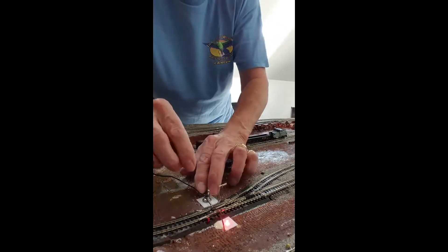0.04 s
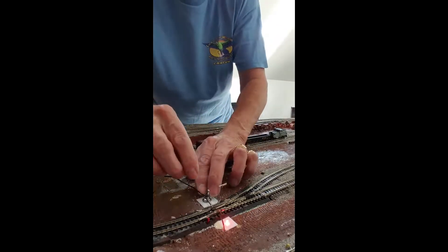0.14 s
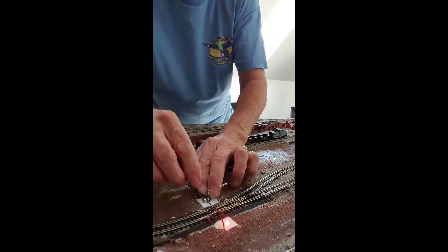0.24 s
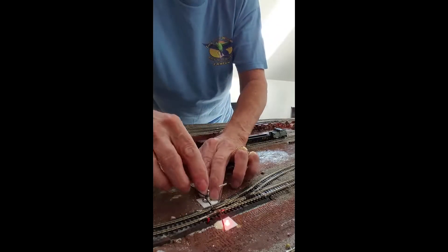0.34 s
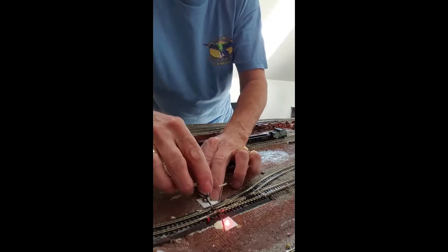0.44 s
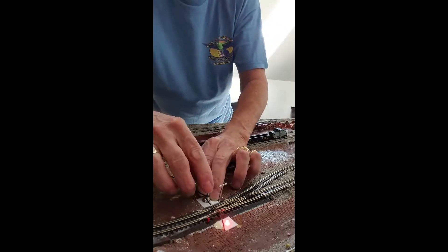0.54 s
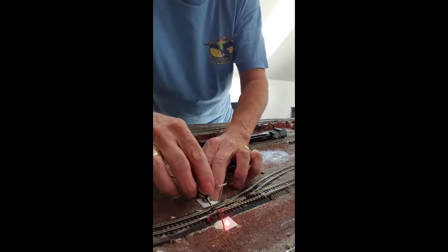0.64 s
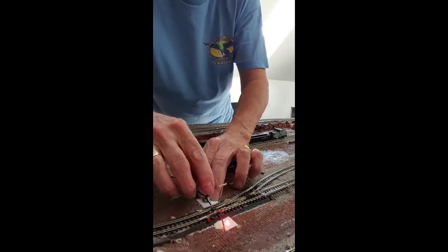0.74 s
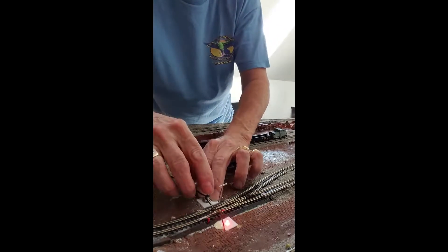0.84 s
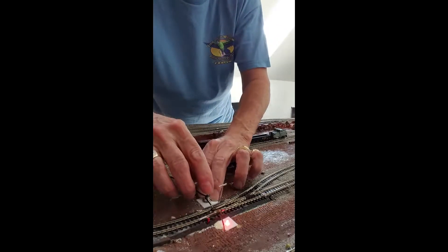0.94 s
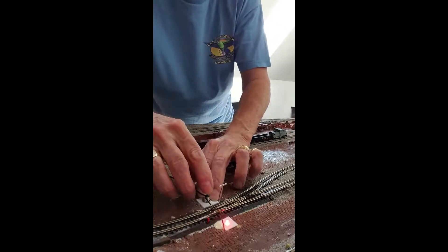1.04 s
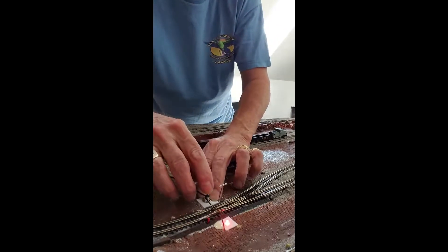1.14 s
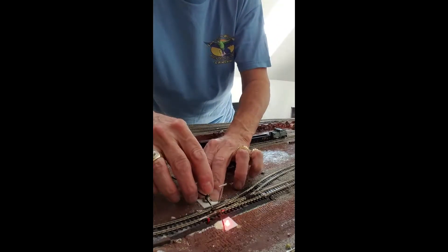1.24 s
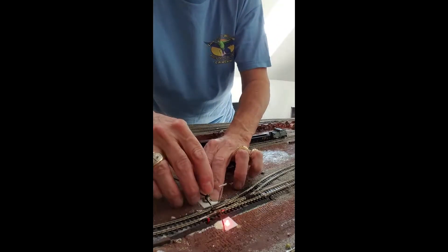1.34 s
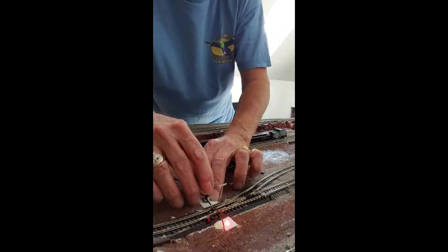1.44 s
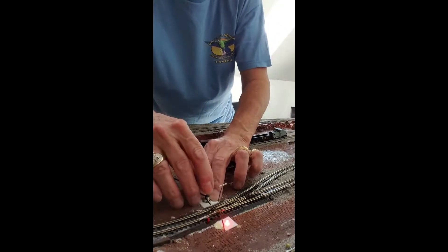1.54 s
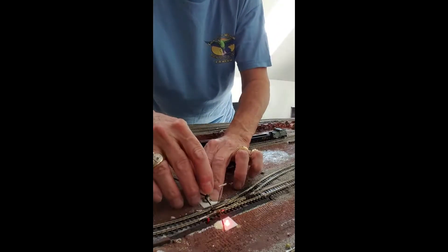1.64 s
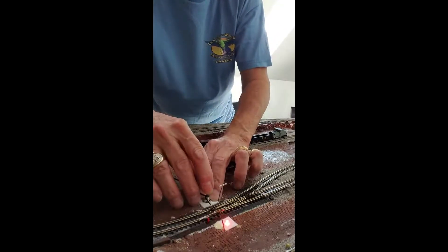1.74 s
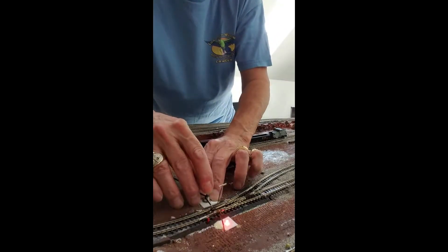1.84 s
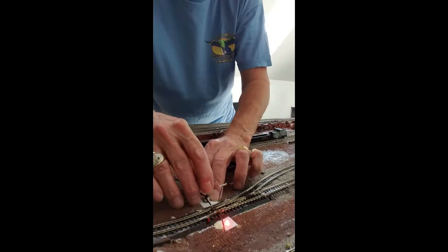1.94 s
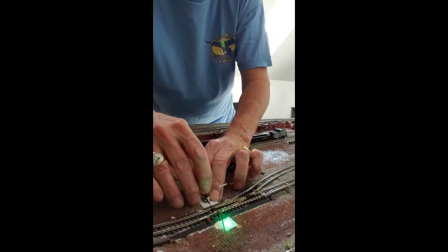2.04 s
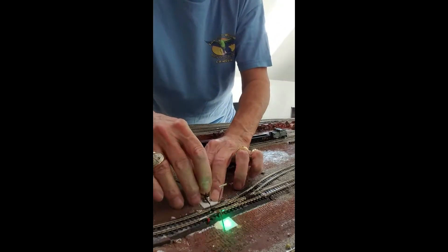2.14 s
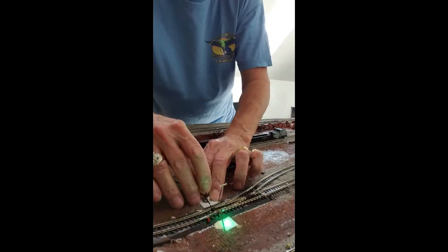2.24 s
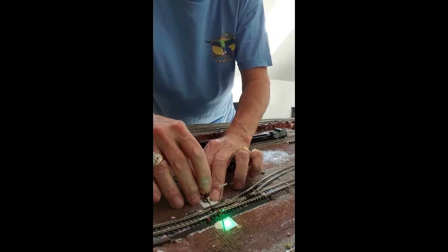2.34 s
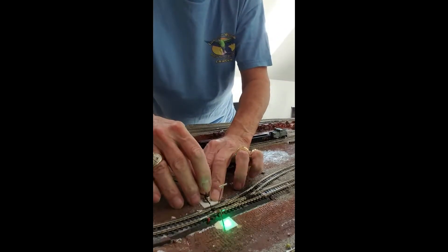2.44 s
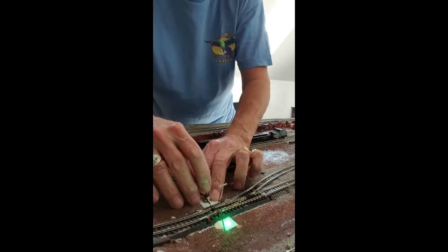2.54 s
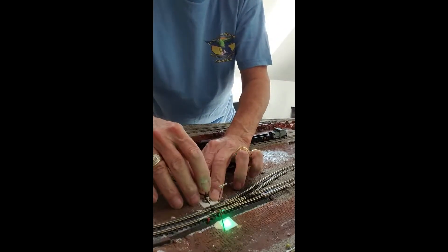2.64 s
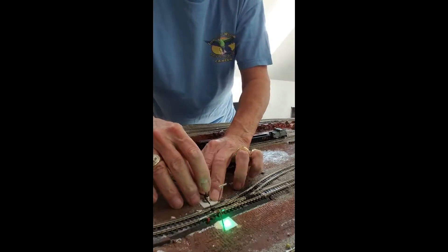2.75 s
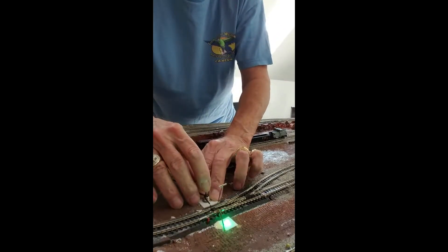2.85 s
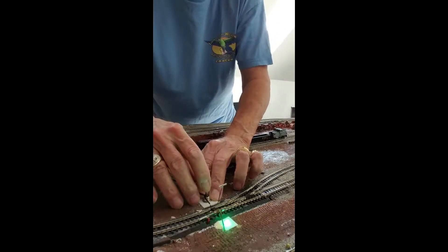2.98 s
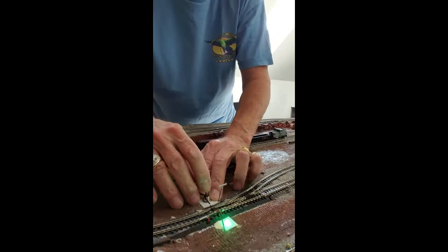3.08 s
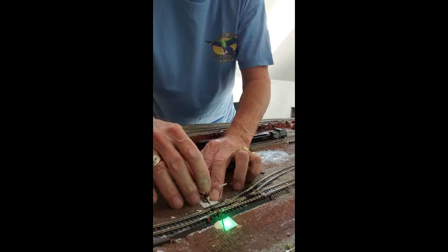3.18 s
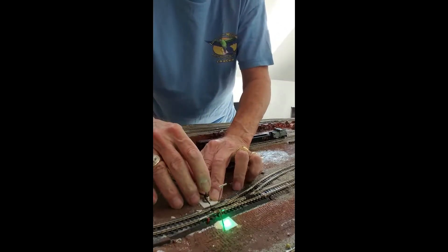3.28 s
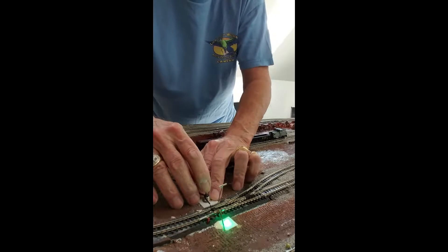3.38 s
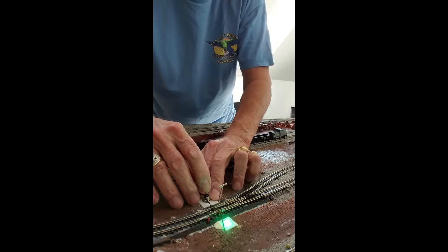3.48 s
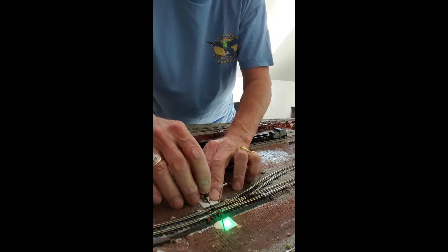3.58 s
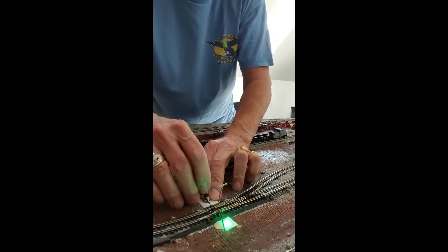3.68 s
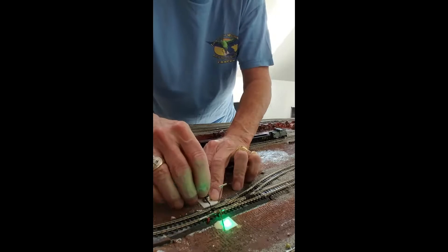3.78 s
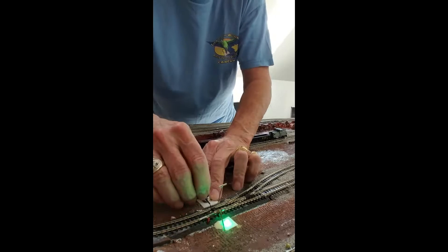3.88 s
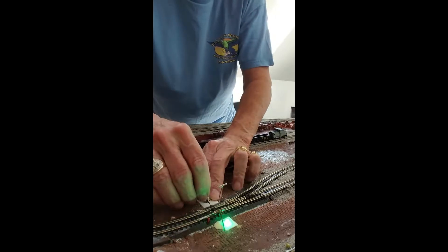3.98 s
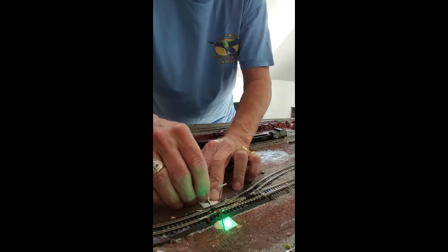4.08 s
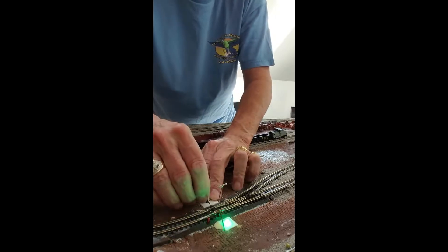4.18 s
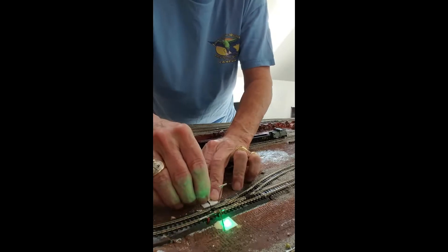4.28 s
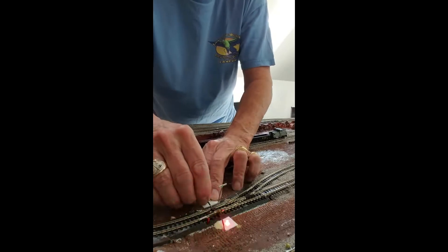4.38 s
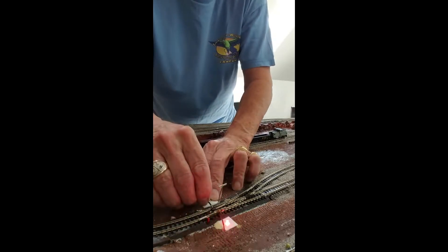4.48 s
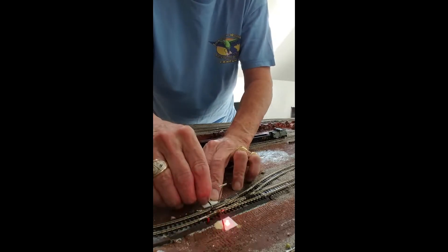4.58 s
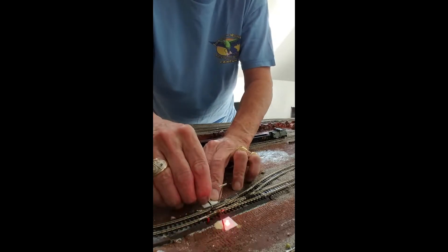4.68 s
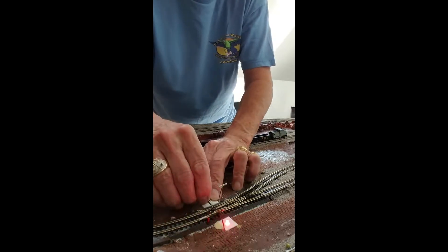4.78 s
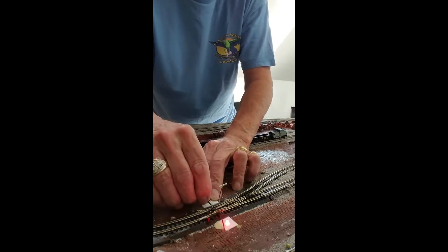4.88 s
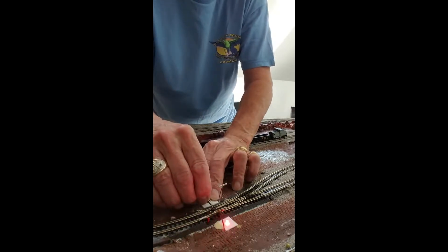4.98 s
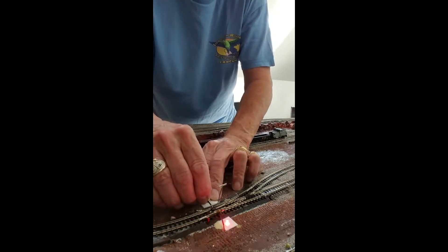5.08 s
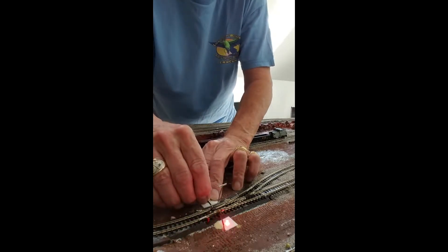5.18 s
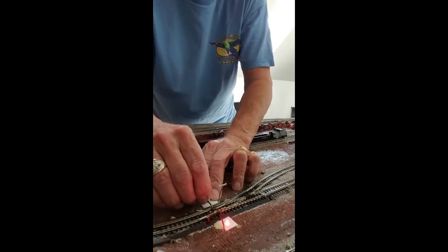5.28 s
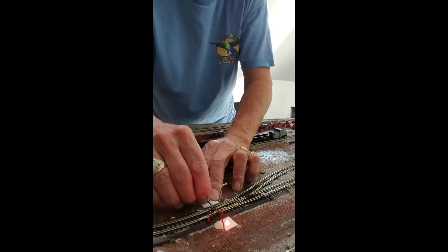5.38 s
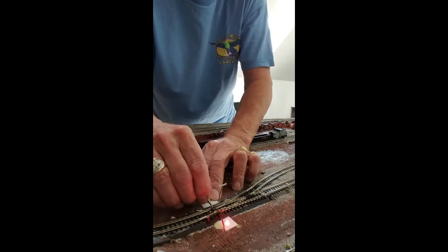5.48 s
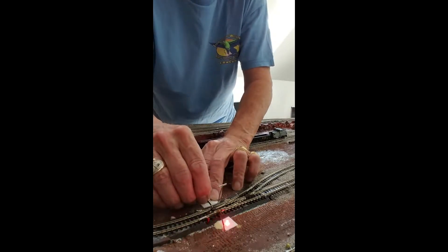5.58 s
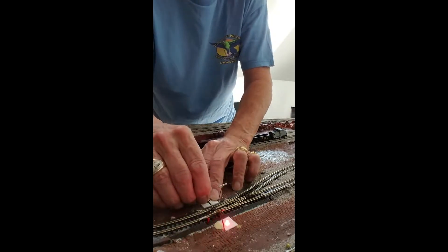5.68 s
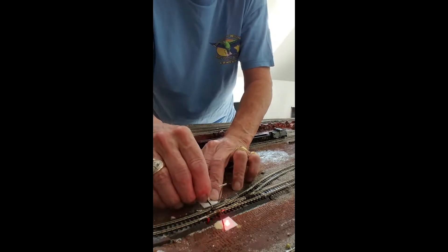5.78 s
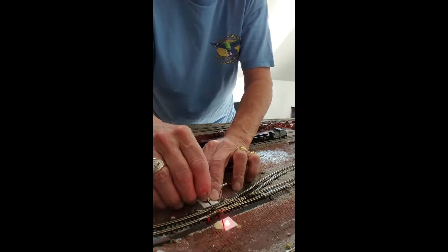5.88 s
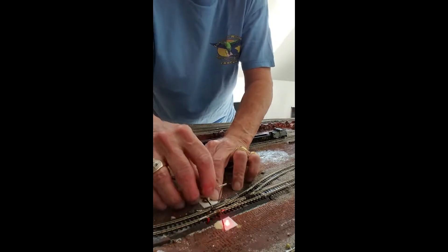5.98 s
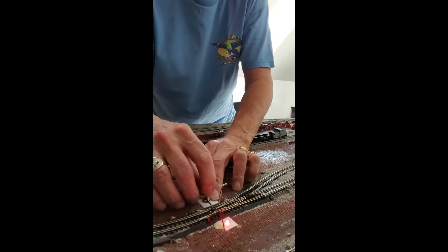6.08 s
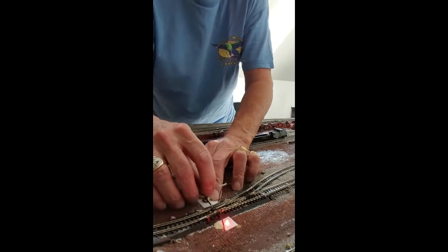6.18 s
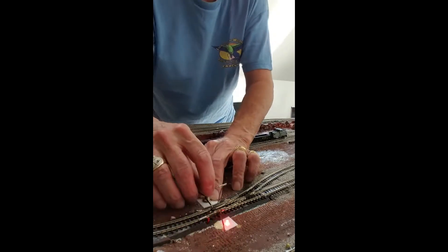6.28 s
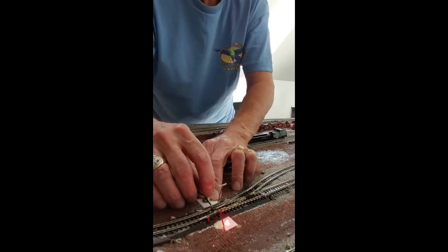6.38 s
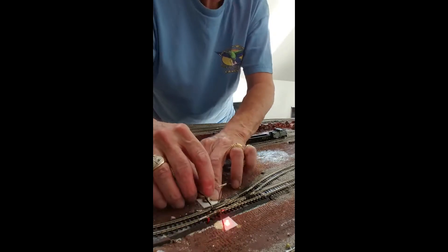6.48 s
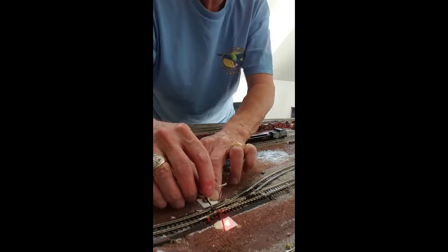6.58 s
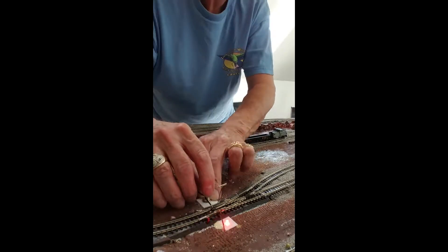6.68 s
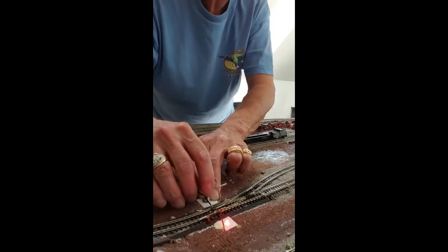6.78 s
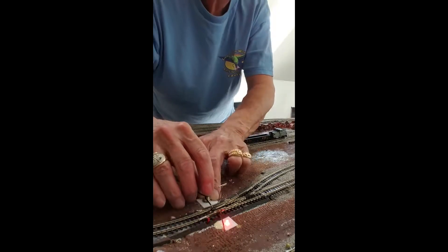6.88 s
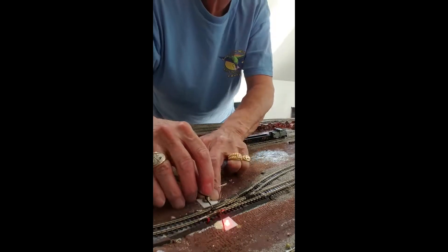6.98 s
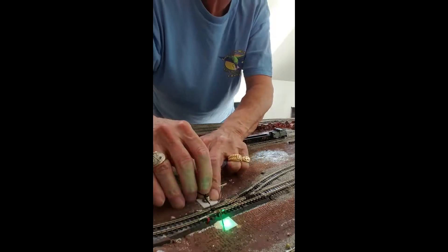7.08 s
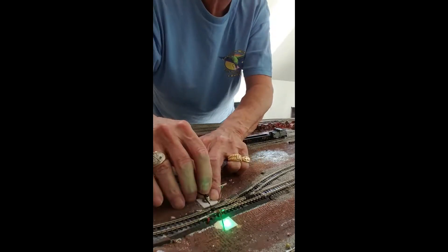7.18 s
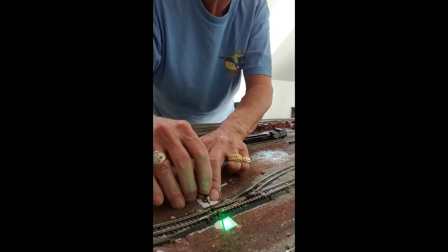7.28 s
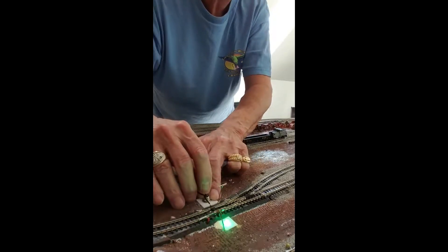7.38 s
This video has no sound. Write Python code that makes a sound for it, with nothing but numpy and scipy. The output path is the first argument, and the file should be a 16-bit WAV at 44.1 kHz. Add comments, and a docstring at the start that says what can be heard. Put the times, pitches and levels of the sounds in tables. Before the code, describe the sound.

Close fumbling touches on a hollow board, then a sharp metallic switch crack, followed by light ticks and two softer snaps in a quiet small room.

```python
"""From the start, air hiss (shaped noise) and a wavering hum with a trace of buzz (sines) lie underneath.
Fingers and nails tap (bursts of noise, damped board modes) and rub (random jerks) around a toggle switch
in a wooden model railway board. At about 2.2, 4.5 and 7.1 s the lever slides and snaps over: a rattling
metal crack (noise) sets the board ringing, with touches in between; a small room answers every sound."""
import sys
import numpy as np
from scipy import signal
from scipy.io import wavfile

SR = 44100
rng = np.random.default_rng(int(sys.argv[2]) if len(sys.argv) > 2 else 0)


def persist_wave(psi):
    """Save psi, clipped to +-1, as 16-bit WAV."""
    counts = np.round(np.clip(psi, -1, 1) * 32767).astype(np.int16)
    wavfile.write(sys.argv[1], SR, np.atleast_2d(counts).T)


N = 327663
TIME = np.arange(N) / SR
BLOW_TIME = TIME[:SR // 12]  # span of one contact
RING_TIME = TIME[:SR // 3]  # span of board ringing and of reflections
BANDS_HZ = 15000 / 2 ** (np.arange(27)[::-1] / 3)  # third-octave centres
EDGES_HZ = np.geomspace(360, 16800, 23) - 300  # edges of bands that widen with frequency


def from_db(db):
    """Level to amplitude: 20 dB is a factor of ten."""
    return 10 ** (np.asarray(db) / 20)


def at_hz(table, hz):
    """Interpolation on a logarithmic frequency axis gives a table's columns at hz."""
    pitches, *columns = np.transpose(table)
    return [np.interp(np.log(hz), np.log(pitches), column) for column in columns]


def fade(t, t60):
    """Exponential decay: free decay loses 60 dB in t60 seconds."""
    return np.exp(-np.log(1000) * t / t60)


def unit_energy(x):
    """Energy normalisation: the squares of each row sum to 1."""
    return x / np.sqrt(np.sum(x ** 2, axis=-1, keepdims=True) + 1e-30)


def band_pass(x, low, high):
    """Causal filtering: a Butterworth band-pass keeps low to high Hz."""
    sections = signal.butter(2, [low, high], "band", fs=SR, output="sos")
    return signal.sosfilt(sections, x + 1e-18)


def third_octave(x, hz):
    """Constant relative bandwidth: a third of an octave around hz, energy 1 per row."""
    return unit_energy(band_pass(x, hz / 2 ** (1 / 6), hz * 2 ** (1 / 6)))


def stereo(pair, pan_db, alike):
    """Interchannel correlation: mixing two unrelated signals sets left-right balance and likeness."""
    alike, sides = np.clip(alike, -1, 1), np.array([[1], [-1]])
    mid, side = pair[..., :1, :], pair[..., 1:, :]
    mixed = np.sqrt((1 + alike) / 2) * mid + np.sqrt((1 - alike) / 2) * side * sides
    return mixed * from_db(sides * pan_db / 2)


def drift(rate):
    """Slow random modulation: straight lines join normal random values drawn rate times a second."""
    knots = np.arange(0, TIME[-1] + 1, 1 / rate)
    return np.interp(TIME, knots, rng.standard_normal(len(knots)))


def add(out, sounds, times):
    """Superposition: each sound is summed in at its time."""
    for sound, s in zip(sounds, times):
        start = max(round(s * SR), 0)
        out[:, start:start + sound.shape[-1]] += sound[:, :N - start]


# Direct sound at the two microphones: f/Hz, left-right/dB, likeness (1 = identical)
DIRECT_SIDES = [(100, -10.5, 0.82), (348, -1, .92), (781, -8.5, 0.21), (1550, -1, 0.68), (3260, -5, 0),
                (5730, 9.5, 0), (9450, -3.5, .1), (14600, 12.5, 0.41)]


def microphones(hz):
    """Interchannel level difference and correlation of the direct sound vary with frequency."""
    return at_hz(DIRECT_SIDES, hz)


# Still air: f/Hz, level/dB per third octave, left-right/dB, likeness
AIR_HISS = [(30.8, -72.5, -5, 0.44), (54.4, -71.5, 3, 0.11), (99, -76.5, 6, 0.97), (168, -79, -3.5, 0.25),
            (400, -77, -1, 0.28), (860, -80.5, -3.5, 0.13), (1720, -80, -1, 0.39), (3207, -83, -0.5, 0.1),
            (6500, -87, 2, 0.083), (9900, -86, -2, .1), (12500, -81, -0.5, 0.083), (14760, -77.5, 1, .1)]
HUM_HZ, BUZZ_HZ = 89, 119
HUM_DB, HUM_SWELL_DB = -73.5, 6  # amplitude before the left and right gains; swell to either side
HUM_PERIOD_S, HUM_CREST_S, HUM_WANDER_RAD = 2.55, 1.3, 0.99


def background(waver_db):
    """Stationary noise and modulated tones: even hiss, a wavering low hum and a trace of mains buzz."""
    white, hiss = rng.standard_normal((2, 2, N)), 0
    for k, hz in enumerate(BANDS_HZ):
        level_db, pan_db, alike = at_hz(AIR_HISS, hz)
        band = stereo(third_octave(white[k % 2], hz), pan_db, alike)
        hiss = hiss + from_db(level_db) * np.sqrt(N) * band
    swell_db = HUM_SWELL_DB * np.cos(2 * np.pi * (TIME - HUM_CREST_S) / HUM_PERIOD_S)
    hum_gain = from_db(HUM_DB + swell_db + waver_db * drift(36))
    hum = hum_gain * np.sin(2 * np.pi * HUM_HZ * TIME + HUM_WANDER_RAD * drift(18))
    buzz_gain = from_db(-74 + waver_db * drift(3.3))
    buzz = buzz_gain * np.sin(2 * np.pi * BUZZ_HZ * TIME + drift(1))
    return hiss + hum * from_db([[1], [7]]) + buzz * from_db([[-3], [3]])


# Fingertips dragging over board and lever: start t/s, end t/s, relative level/dB at the start,
# swell/dB by the end
STROKES_OF_FINGERS = [(0.056, 0.174, -54.5, -4.5), (0.263, 0.732, -58, -6.5), (1.115, 1.507, -74, -10),
                      (3.183, 3.376, -57, -4), (3.735, 3.892, -60.5, -5), (4.1, 4.118, -63, -6),
                      (4.377, 4.51, -57.5, 5), (5.975, 6.25, -54, -5), (6.382, 6.506, -53.5, -3.5),
                      (6.985, 7.029, -44.5, -8), (7.076, 7.155, -50.5, 9)]
STROKE_ATTACK_S, STROKE_RELEASE_T60_S = 0.032, 0.305
RESTING_RUB_DB, RESTING_WAVER_DB = -72.5, 6.5  # resting fingers never keep quite still


def pressure():
    """Amplitude envelope: strokes set in quickly, swell or ease and let go; between them fingers rest."""
    total = from_db(RESTING_RUB_DB + RESTING_WAVER_DB * drift(20))
    for start, end, level_db, swell_db in STROKES_OF_FINGERS:
        attack = np.clip(1 + (TIME - start) / STROKE_ATTACK_S, 0, 1)  # complete at start
        release = fade(np.maximum(TIME - end, 0), STROKE_RELEASE_T60_S)
        stroke_db = level_db + np.interp(TIME, [start, end], [0, swell_db])
        total = total + attack * release * from_db(stroke_db)
    return total


# Colour of the dragging: f/Hz, relative level/dB per third octave
FRICTION_COLOUR = [(60, -31), (130, -22), (260, -10), (420, -8.5), (800, -17), (1400, -23.5), (3000, -18.5),
                   (6000, -28), (10000, -33), (15000, -27.5)]


def rubbing(slips_per_s, grain_db):
    """Stick-slip friction: skin sticks and slips in many small, uneven jerks."""
    slips = (rng.random(N) < slips_per_s / SR) * from_db(grain_db * rng.standard_normal(N))
    jerks = slips * rng.standard_normal((2, 2, N))
    sound = 0
    for k, hz in enumerate(BANDS_HZ):
        band = stereo(third_octave(jerks[k % 2], hz), *microphones(hz))
        sound = sound + from_db(at_hz(FRICTION_COLOUR, hz)[0]) * band
    return sound * np.sqrt(N) * pressure()


# Where thud, level, knock, tick and sheen act: f/Hz
COLOUR_ZONES_HZ = [190, 450, 770, 2900, 12000]


def force(blows, hz):
    """Excitation spectrum: flesh gives thud, nail and metal give tick and sheen."""
    _, level_db, thud_db, *upper_db = np.transpose(blows)
    colours = [thud_db, 0 * level_db, *upper_db]
    table = np.column_stack([COLOUR_ZONES_HZ[:len(colours)], colours])
    return from_db(level_db + at_hz(table, hz))[:, None, None]


def contacts(blows, spectrum, rattle, ring_db, ring_t60, lead):
    """Impact noise: a brief rattle of tiny impacts trails off in dense ringing and scuffing."""
    swell = BLOW_TIME / rattle  # the rattle peaks at 1
    ringing = from_db(ring_db) * np.tanh(swell) * fade(BLOW_TIME, ring_t60)
    envelope = swell ** 2 * np.exp(2 * (1 - swell)) + ringing
    impacts = rng.standard_normal((len(blows), 2, 2, len(BLOW_TIME))) * envelope
    sounds, out = 0, np.zeros((2, N))
    for k, (low, high) in enumerate(zip(EDGES_HZ, EDGES_HZ[1:])):
        hz, thirds = (low + high) / 2, 3 * np.log2(high / low)  # thirds: width in third octaves
        band = stereo(unit_energy(band_pass(impacts[:, k % 2], low, high)), *microphones(hz))
        gain = from_db(at_hz(spectrum, hz)[0]) * np.sqrt(thirds)
        sounds = sounds + force(blows, hz) * gain * band
    add(out, sounds, np.array(blows)[:, 0] - lead)
    return out


# Modes of the board, the switch case and, ringing faintly on, its metal parts:
# f/Hz, relative level/dB, t60/s
BOARD_MODES = [(89, -31.5, 0.55), (106.5, -14.5, 0.3), (128.5, -19.5, .07), (189.8, -21, 0.26),
               (245.4, -9.5, 0.11), (316, 1.5, 0.031), (391, 2.5, 0.037), (395, -16, .27), (453, -1.5, .04),
               (512.7, -19, 0.19), (626, -5.5, 0.037), (820, -2, 0.034), (839.3, -23.5, 0.19),
               (848, 0.5, 0.016), (943, -10.5, 0.072), (1015.5, -1, 0.024), (1511, -1, 0.028),
               (1496, -21, .14), (1868, 2, 0.029), (2000, -19, 0.08), (2240, -21, 0.14), (2345, -7, .035),
               (2630, -21.5, 0.12), (2822, -11, 0.043), (3210, -5, 0.033), (3880, -4.5, 0.018),
               (4550, -7, 0.03)]


def board(blows, scatter_db, port_lag, phase_spread):
    """Modal superposition: each blow rings the same modes with varied levels, later at the right side."""
    rings, out = 0, np.zeros((2, N))
    skews = phase_spread * rng.choice([-1, 1], len(BOARD_MODES))
    chance = rng.standard_normal((len(blows), len(BOARD_MODES), 2, 1))
    t = np.maximum(RING_TIME - np.array([[0], [port_lag]]), 0)
    sides = np.array([[1], [-1]])
    for k, (hz, level_db, t60) in enumerate(BOARD_MODES):
        pan_db, alike = microphones(hz)
        phase = sides * skews[k] * (1 - alike)  # left and right out of step
        build_up = np.tanh(np.pi * hz * t)  # within a cycle
        swing = build_up * np.sin(2 * np.pi * hz * t + phase)
        mode = (-1) ** k * swing * fade(t, t60) * from_db(sides * pan_db / 2)
        rings = rings + force(blows, hz) * from_db(level_db + scatter_db * chance[:, k]) * mode
    add(out, rings, np.array(blows)[:, 0])
    return out


def grazes(count):
    """Random events, one per equal interval: fidgeting fingers graze the lever from 2.5 to 5.9 s."""
    when, level, hardness = rng.uniform(0, 1, (count, 3)).T
    s = 2.5 + (5.9 - 2.5) * (np.arange(count) + when) / count
    return np.column_stack([s, -68.5 + 6 * level, -8 + 6 * hardness])  # t/s, level/dB, hardness/dB


# Fingers and nails on lever and board: t/s, relative level/dB, hardness/dB (about 0 nail, -30 flesh)
FINGER_TOUCHES = [(0.056, -34.5, -21.5), (0.066, -31, -26), (0.081, -33.5, -23), (0.128, -41, -16),
                  (0.147, -40, -8.5), (0.158, -39, -11), (0.268, -32.5, -19.5), (0.293, -32.5, -36),
                  (0.317, -42, -37), (0.356, -35.5, -40), (0.441, -40, -18.5), (0.472, -32, -30),
                  (0.513, -34.5, -21.5), (0.555, -50, -9), (0.644, -55, -2), (0.662, -31.5, -30.5),
                  (0.678, -34.5, -34), (0.792, -42.5, -9.5), (0.865, -46.5, -19), (1.171, -51, -4),
                  (1.266, -53.5, -5.5), (1.364, -49, -7), (1.492, -38.5, -16), (1.821, -53.5, 0.5),
                  (2.595, -59, -8), (2.844, -49, -6.5), (3.118, -49, -16), (3.211, -46, -10.5),
                  (3.231, -39.5, -11.5), (3.25, -36, -9.5), (3.344, -43, -19), (3.408, -49.5, -24),
                  (3.548, -51, -32), (3.71, -48.5, -19), (3.83, -39, -13), (3.841, -38, -18),
                  (3.876, -38, -19), (4.254, -42, -9), (4.427, -53, 0), (4.473, -44, -2),
                  (4.648, -46, -10.5), (5.051, -56.5, -2), (5.366, -54.5, -2), (5.634, -41, -5.5),
                  (5.775, -52.5, -13), (5.984, -32, -17), (6.027, -40, -18), (6.107, -41.5, -22),
                  (6.176, -39, -18), (6.384, -39.5, -12), (6.396, -46, -2.5), (6.431, -33.5, -13.5),
                  (6.457, -35.5, -20), (6.518, -48, -4), (6.616, -47.5, -31), (6.66, -50, -32),
                  (6.876, -49.5, -26), (6.967, -49.5, -11.5), (6.98, -42, -10), (7.013, -41, -13)]
KNOCK_DB, KNOCK_PER_HARDNESS = 6.5, 0.91  # knock of a nail; dB of knock per dB of hardness
FLESH_THUD_DB, NAIL_THUD_DB = -1.5, -20.5  # flesh pushes the board, a nail barely does
FLESH_HARDNESS_DB, NAIL_HARDNESS_DB = -11.5, -5  # softer is all flesh, harder is all nail
HAND_RESTS_S, HOVER_THUD_DB = 1.1, -30  # thud is lowered until the hand rests on the board


def touch_colours():
    """Contact stiffness: harder touches tick and knock more, thud less: t/s, level, thud, knock, tick/dB."""
    s, level_db, hardness_db = np.vstack([FINGER_TOUCHES, grazes(count=10)]).T
    hardness_limits = [FLESH_HARDNESS_DB, NAIL_HARDNESS_DB]
    thud_db = np.interp(hardness_db, hardness_limits, [FLESH_THUD_DB, NAIL_THUD_DB])
    thud_db = thud_db + HOVER_THUD_DB * (s < HAND_RESTS_S)
    knock_db = KNOCK_DB + KNOCK_PER_HARDNESS * hardness_db
    return np.column_stack([s, level_db, thud_db, knock_db, hardness_db])


# Dense, quickly damped ringing of a touch: f/Hz, relative level/dB per third octave
TAP_COLOUR = [(70, -4), (130, 0), (230, 2), (420, 6), (600, 1.5), (850, 3), (1400, -14), (2500, 3.5),
              (4200, -0.5), (7000, -4.5), (10000, -12.5), (15000, -8.5)]


def fingers(drag):
    """Contact duration follows hardness: a nail ticks briefly, dull flesh drags on, on the same board."""
    touches = touch_colours()
    tick_db = touches[:, -1, None, None, None]
    ring_db = -9.0 - drag * np.minimum(tick_db, 0)  # the softer, the more scuffing
    taps = contacts(touches, TAP_COLOUR, rattle=0.0011, ring_db=ring_db, ring_t60=0.053, lead=0.0005)
    ringing = board(touches, scatter_db=2.5, port_lag=.00008, phase_spread=0.66)
    return from_db(13.0) * taps + from_db(-11.5) * ringing


# The lever sliding over its pivot just before it snaps: t/s, relative level/dB,
# then relative to that level: thud/dB, knock/dB, tick/dB, sheen/dB
LEVER_SLIDES = [(2.149, -30, 5, 3.5, -9, -43.5), (4.454, -38, 0.5, 1.5, -18, -26.5),
                (7.113, -37, 7.5, 9, -20, -20)]
# Throws of the lever: t/s, relative level/dB, then relative to it: thud/dB, knock/dB, tick/dB, sheen/dB
LEVER_THROWS = [(2.159, -8.5, -4.5, -13.5, -10.5, -13.5), (4.4888, -23.5, -18.5, 3, 5.5, -3),
                (7.1313, -25, 8, 10.5, 4.5, 4)]
# Dense, quickly damped ringing of a throw: f/Hz, relative level/dB per third octave
CRACK_COLOUR = [(100, -24), (300, -17.5), (700, -13.5), (1250, -14), (1900, -9), (2800, -3), (4200, -4),
                (6000, -12.5), (7500, -3.5), (10000, -15), (12000, -9.5), (15000, -0.5)]


def switch():
    """Snap action: the lever slides, the spring snaps the contact over; it chatters and kicks the board."""
    slide = contacts(LEVER_SLIDES, TAP_COLOUR, rattle=0.003, ring_db=3.0, ring_t60=0.23, lead=0.00021)
    crack = contacts(LEVER_THROWS, CRACK_COLOUR, rattle=0.00099, ring_db=-17, ring_t60=0.067, lead=.0015)
    ringing = board(LEVER_THROWS, scatter_db=3.0, port_lag=.00008, phase_spread=.8)
    return from_db(15.5) * (slide + crack) + ringing


# The room's diffuse tail: f/Hz, relative level/dB, t60/s, left-right/dB
ROOM_DECAY = [(80, -6, 0.24, -3.5), (200, -5.5, 0.1, -5.5), (400, -13.5, 0.36, -4.5), (970, -16, 0.13, -2),
              (2180, -7.5, 0.2, -5.5), (4500, -9, 0.27, 2), (8200, 0.5, 0.13, 1), (14900, -11.5, 0.33, 3)]


def room(direct, build_up, wall_delay, wall_db, diffuse_db):
    """Reverberation: one wall echoes; a diffuse tail stores the energy of each band and lets it die."""
    source, white, tail = direct.mean(axis=0), rng.standard_normal((2, 2, N)), 0
    filling = np.exp(-1 / (build_up * SR))
    for k, (low, high) in enumerate(zip(EDGES_HZ, EDGES_HZ[1:])):
        hz = (low + high) / 2
        level_db, t60, pan_db = at_hz(ROOM_DECAY, hz)
        keep = fade(1 / SR, t60) ** 2  # energy kept from sample to sample
        power = band_pass(source, low, high) ** 2
        energy = signal.lfilter([(1 - keep) * (1 - filling)], np.poly([keep, filling]), power)
        noise = unit_energy(band_pass(white[k % 2], low, high))
        diffuse = stereo(noise, pan_db, microphones(hz)[1])
        tail = tail + from_db(level_db) * np.sqrt(N * np.abs(energy)) * diffuse
    echo = np.interp(TIME - wall_delay, TIME, band_pass(source, 4200, 14000), left=0)
    return from_db(diffuse_db) * tail + from_db(wall_db) * echo


def reflections(direct, per_s, t60, level_db):
    """Convolution with sparse reflections: bounces off furniture and walls give the tail a grain."""
    shape = (2, len(RING_TIME))
    arrivals = (rng.random(shape) < per_s / SR) * rng.choice([-1, 1], shape)
    envelope = np.tanh(RING_TIME / 0.0011) * fade(RING_TIME, t60)
    response = unit_energy(band_pass(arrivals * envelope, 720, 5000))
    source = direct.mean(axis=0, keepdims=True)
    heard = signal.fftconvolve(source, response, axes=1)[:, :N]
    return heard * from_db(level_db + np.array([[-3], [3]]))


def scene():
    """Linear superposition: switch and hands close by, their reflections and tail, and the background."""
    direct = switch() + fingers(drag=1.0) + rubbing(slips_per_s=2700, grain_db=2.0)
    tail = room(direct, build_up=0.00045, wall_delay=0.018, wall_db=-22.5, diffuse_db=-1.5)
    bounces = reflections(direct, per_s=2500, t60=0.29, level_db=-19)
    return direct + tail + bounces + background(waver_db=3.0)


def record(dry):
    """Band limiting and soft saturation: small microphones lose deep bass, round peaks; the top is cut."""
    high_pass = signal.butter(2, 55, "high", fs=SR, output="sos")
    thin = signal.sosfilt(high_pass, dry)
    rounded = .8 * np.tanh(thin / .8)
    steep_cut = signal.ellip(10, .2, 80, 16100, fs=SR, output="sos")  # low-pass at 16100 Hz
    return signal.sosfilt(steep_cut, rounded)


dry = scene()
out = record(dry)
persist_wave(out)
```